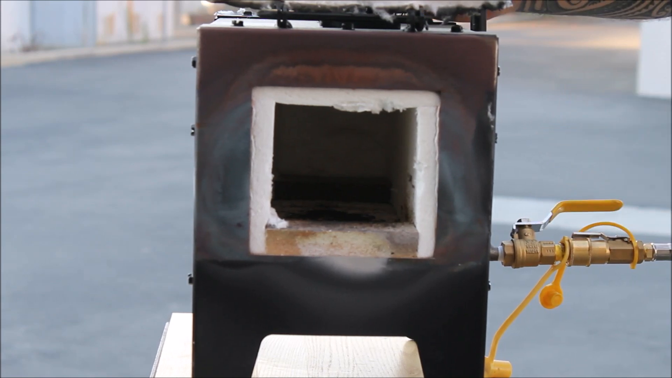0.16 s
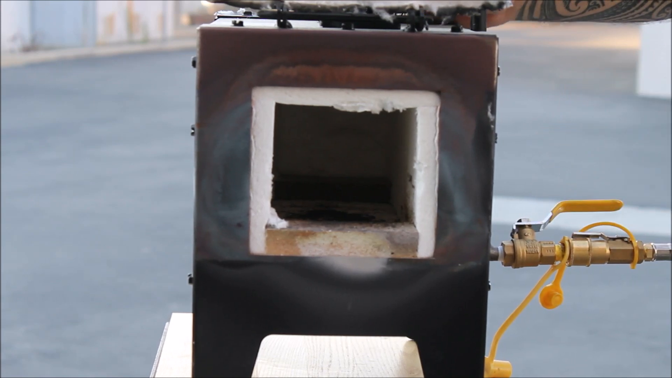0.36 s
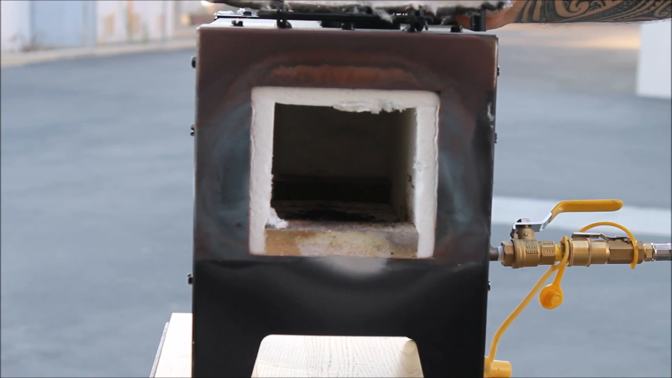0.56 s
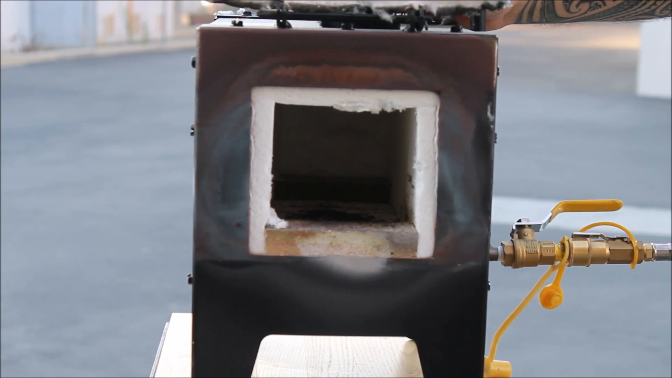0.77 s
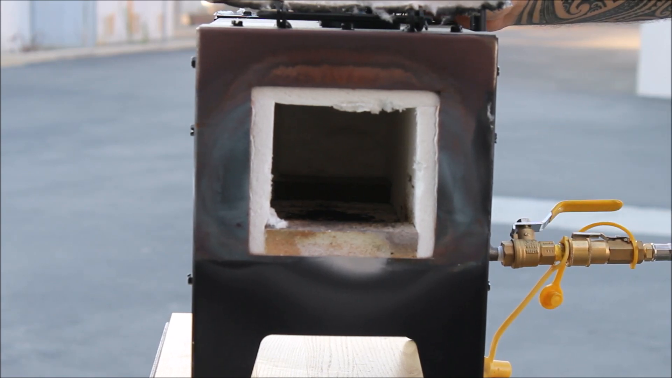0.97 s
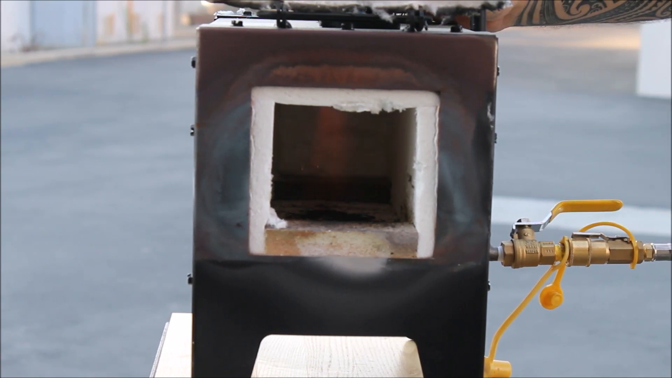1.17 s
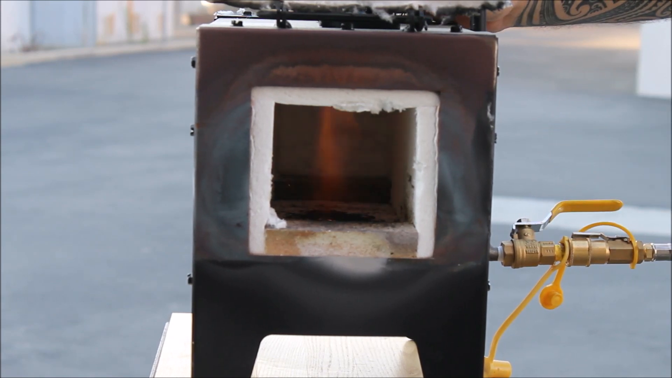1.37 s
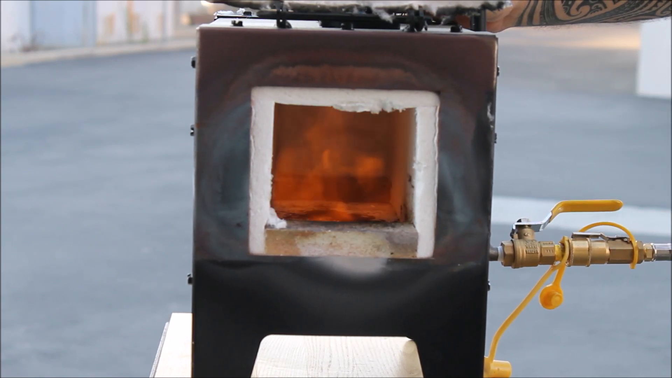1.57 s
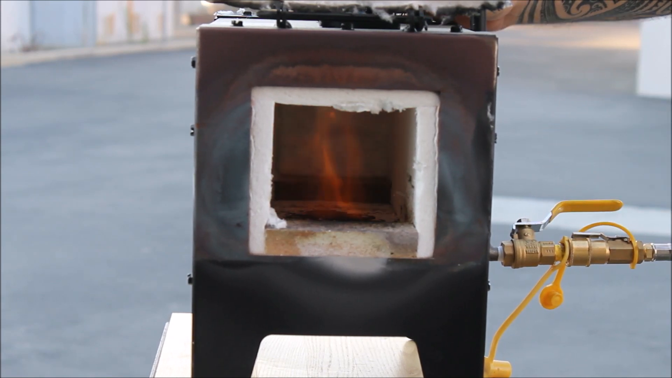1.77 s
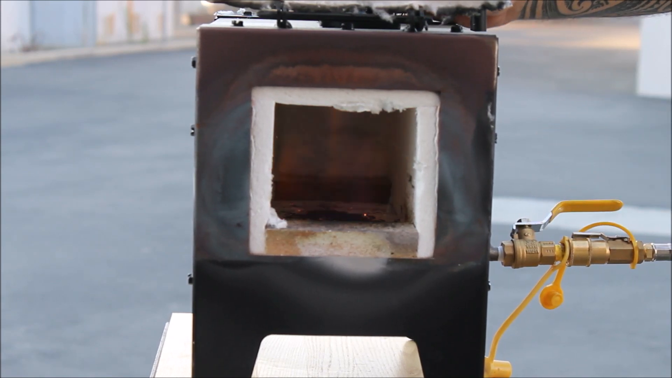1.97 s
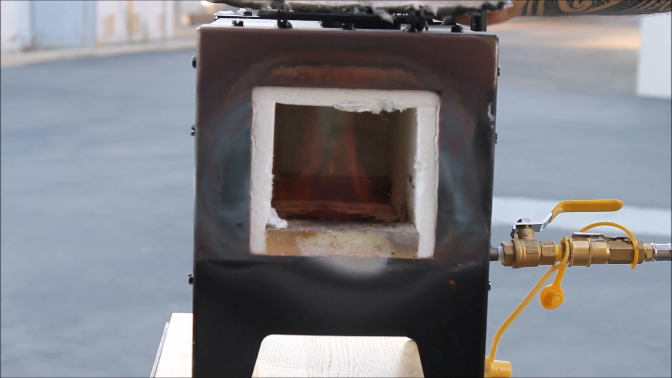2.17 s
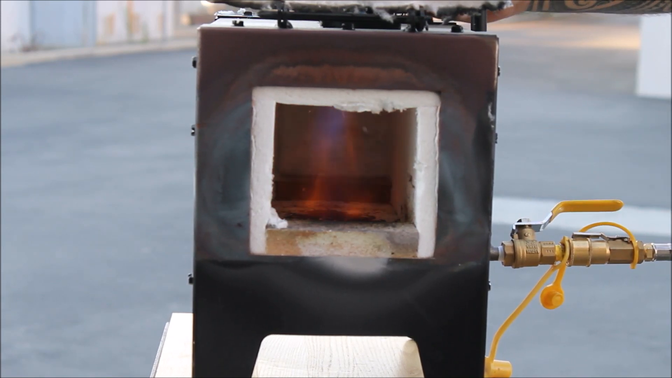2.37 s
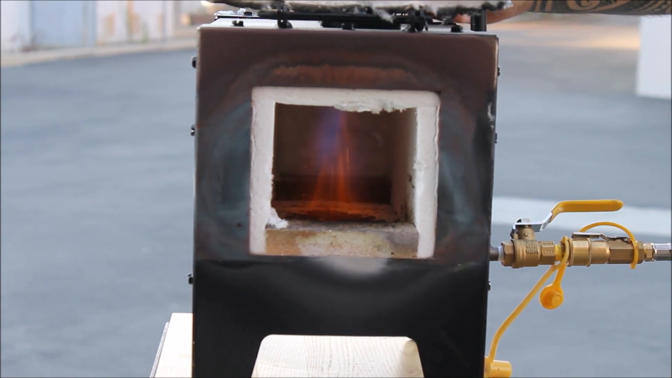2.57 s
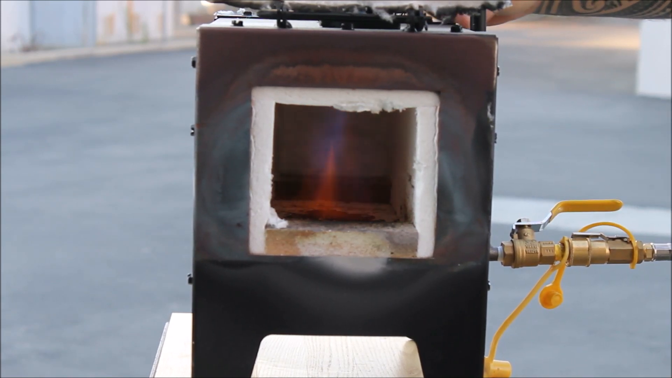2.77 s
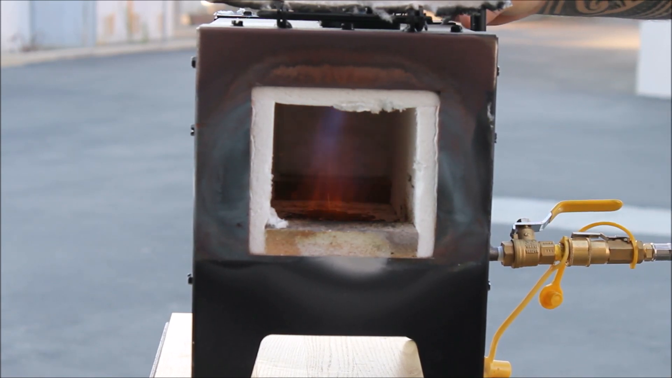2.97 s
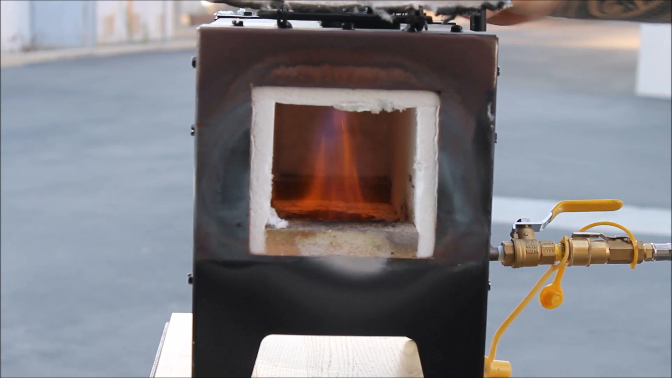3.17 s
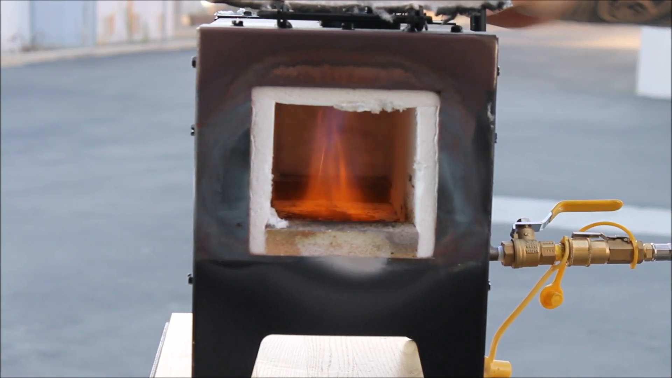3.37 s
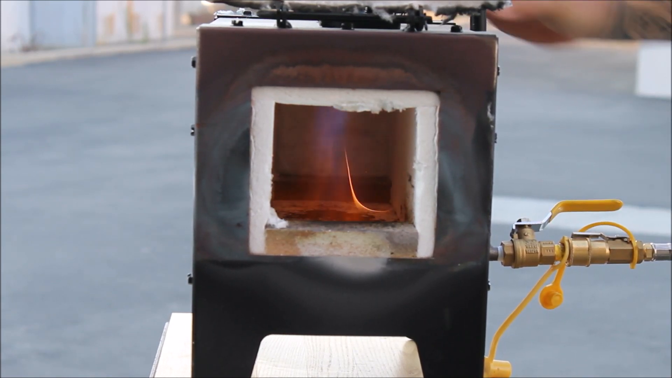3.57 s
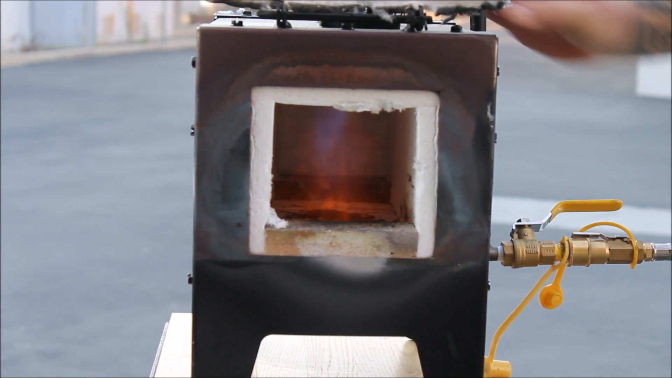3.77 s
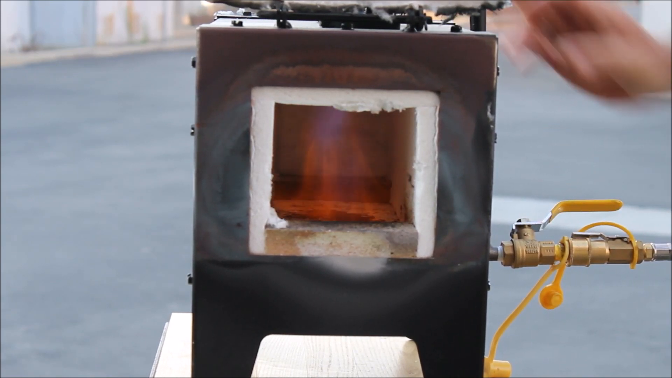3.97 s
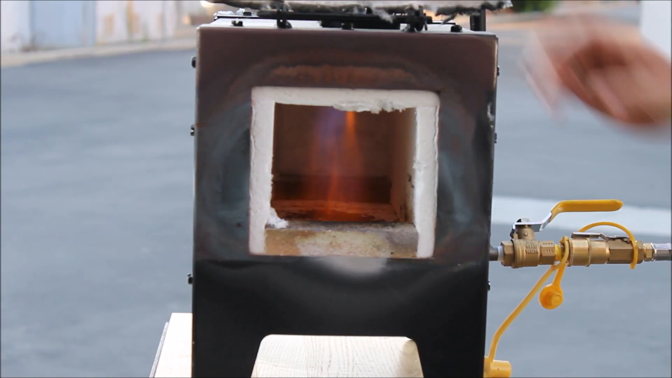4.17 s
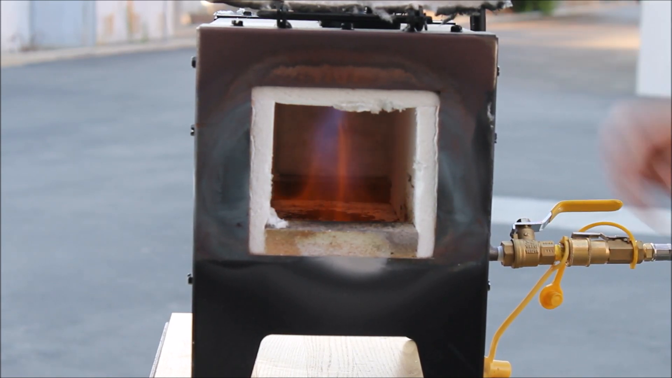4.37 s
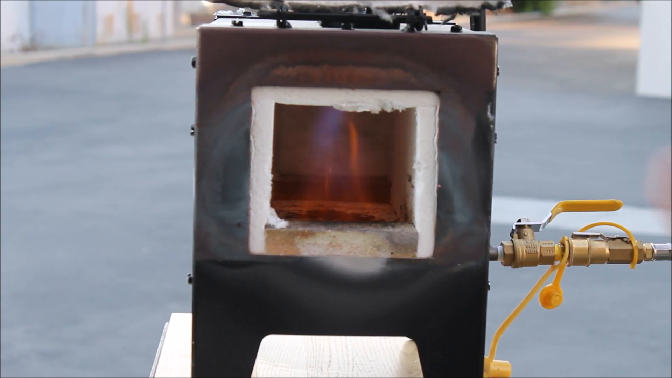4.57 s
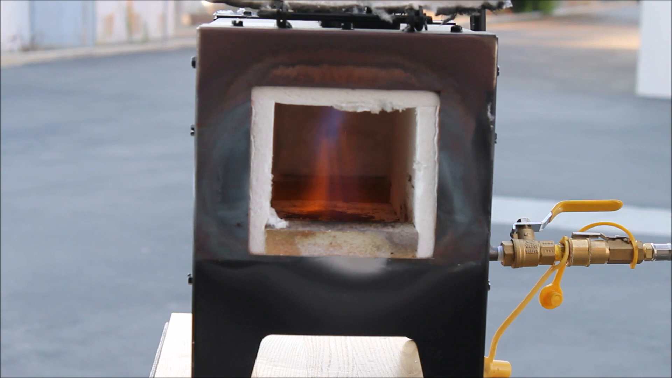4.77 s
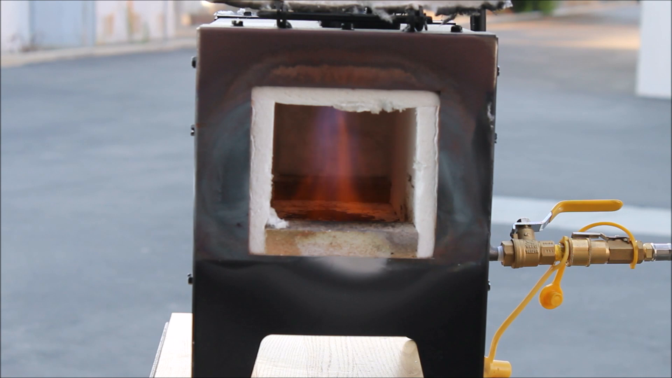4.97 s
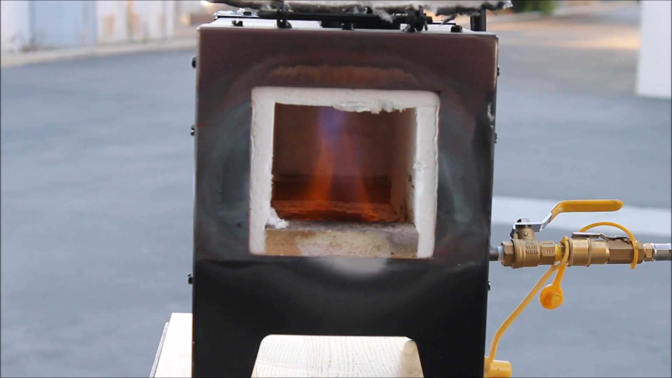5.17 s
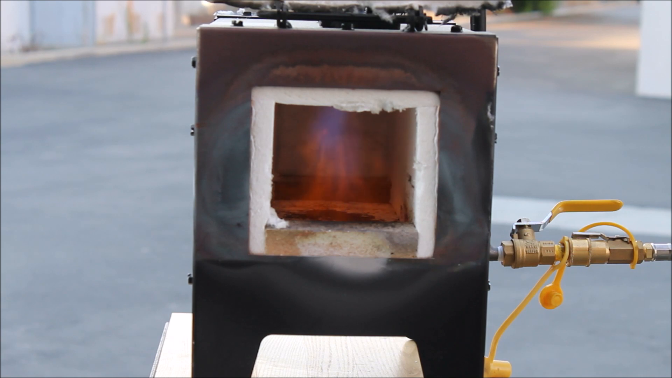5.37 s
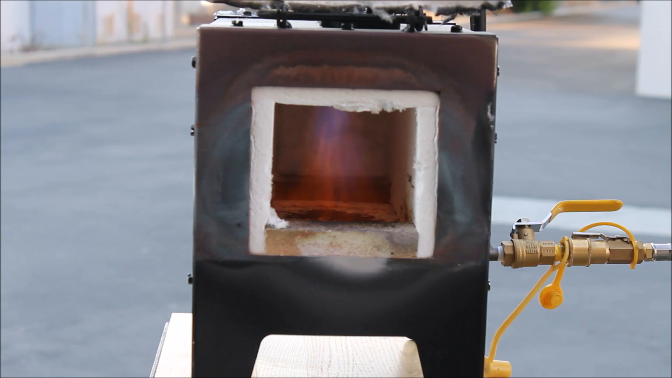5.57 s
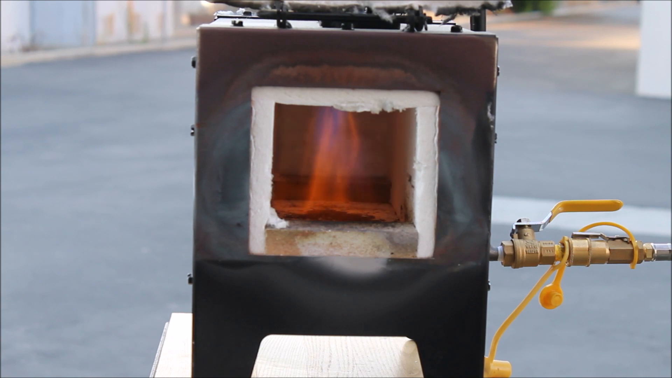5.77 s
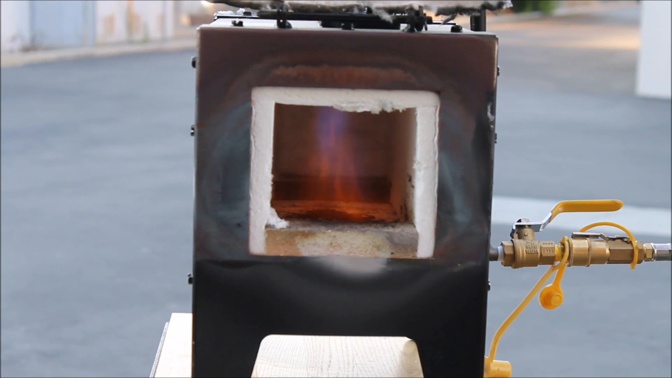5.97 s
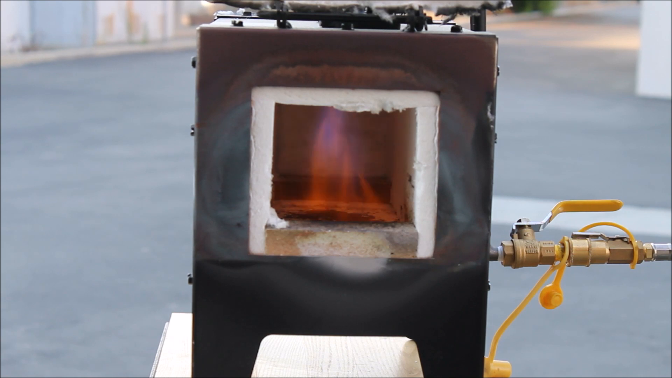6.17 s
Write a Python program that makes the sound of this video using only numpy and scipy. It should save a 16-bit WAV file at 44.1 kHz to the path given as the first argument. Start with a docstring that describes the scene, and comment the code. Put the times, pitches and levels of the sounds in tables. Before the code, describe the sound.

Hissing gas lights with a sharp, sputtering pop and a low whoomp, settling into the steady rumble of a forge flame.

```python
"""Lighting a propane forge

Outdoors, a turbulent gas jet hisses; the sound cuts out for an instant and returns muffled.
The mixture ignites with a sharp pop and sputters, ringing the steel shell, then catches with a low
whoomp. Unsteady combustion drives the air resonance of the open firebox in a steady rumble, while air
drawn through the burner tube whistles faintly. One light metallic tink sounds as the flame grows."""
import sys
import numpy as np
from scipy.fft import rfft, irfft, next_fast_len
from scipy.io import wavfile
from scipy.ndimage import uniform_filter1d, map_coordinates

SR = 44100
rng = np.random.default_rng(int(sys.argv[2]) if len(sys.argv) > 2 else 0)


def store_wav(level_fs):
    """Save 16-bit WAV to argv[1]."""
    pcm = np.round(np.clip(np.atleast_2d(level_fs), -1, 1) * 32767)
    wavfile.write(sys.argv[1], SR, pcm.T.astype(np.int16))


N = 273861


def amp(db):
    """Amplitude ratio of a level in decibels."""
    return 10 ** (np.asarray(db) / 20)


def unit(x):
    """Normalisation to rms 1."""
    return x / np.sqrt(np.mean(x ** 2) + 1e-20)


def contour(rows):
    """Linear interpolation of (t/s, value) rows at every sample."""
    return np.interp(np.arange(N) / SR, *np.transpose(rows))


def wobble(rate):
    """Smooth random modulation with rate knots a second."""
    return map_coordinates(rng.standard_normal(int(N * rate / SR) + 4), [np.arange(N) * rate / SR])


def filtered(x, response):
    """Linear filtering: the spectrum of x times a frequency response."""
    size = next_fast_len(N + SR // 2)
    return irfft(rfft(x, size) * response(np.fft.rfftfreq(size, 1 / SR)), size)[:N]


def colour(points):
    """Frequency response through (f/Hz, level/dB) points on a logarithmic frequency axis."""
    f, db = np.transpose(points)
    return lambda hz: amp(np.interp(np.log(hz + 1), np.log(f + 1), db))


def resonances(hz, modes):
    """Superposed resonance peaks, given as (f/Hz, half-width/Hz, level/dB)."""
    return sum(amp(db) / (1 + ((hz - centre) / width) ** 2) for centre, width, db in modes)


def noise(response):
    """Gaussian noise shaped by a frequency response, at rms 1."""
    return unit(filtered(rng.standard_normal(N), response))


def even(x, span):
    """Division by the running rms levels out swells slower than span seconds."""
    size = max(int(span * SR), 2)
    return x / np.sqrt(np.abs(uniform_filter1d(uniform_filter1d(x ** 2, size), size)) + 1e-9)


def since(onset):
    """Seconds elapsed after the onset, zero before it."""
    return np.maximum(np.arange(N) / SR - onset, 0)


def decay(t, attack, t60):
    """Transient envelope: a quick rise, then an exponential fall of 60 dB in t60 seconds."""
    return (1 - np.exp(-t / attack)) * amp(-60 * np.minimum(t / t60, 3))


def ringing(onset, modes, attack):
    """Free vibration: one damped sine for each (f/Hz, level/dB, t60/s) mode."""
    t = since(onset)
    return sum(amp(db) * decay(t, attack, t60) * np.sin(2 * np.pi * hz * t) for hz, db, t60 in modes)


def power_sum(*amplitudes):
    """Incoherent sources add in power; returns their joint amplitude."""
    return np.sqrt(sum(a ** 2 for a in amplitudes))


# Spectrum of the unlit gas: f/Hz, relative level/dB
JET_SPECTRUM = [(20, -9), (65, -10.5), (100, 0.5), (200, -1.5), (275, -5.5), (420, -3), (660, -7),
                (1600, -13.5), (4700, -22), (8200, -24), (10200, -39), (13000, -51), (15600, -75.5)]
# Nozzle resonances: f/Hz, half-width/Hz, relative level/dB
NOZZLE_MODES = [(3390, 31, -15), (5784, 67, 0), (6630, 120, -14.5), (7230, 120, -14), (8150, 86, -9),
                (11500, 510, -34)]

def gas_jet(hiss_db=-30, nozzle_db=-43):
    """Turbulence in the cold gas radiates broadband noise and excites narrow nozzle resonances."""
    hiss = amp(hiss_db + 0.38 * wobble(12)) * noise(colour(JET_SPECTRUM))
    return hiss + amp(nozzle_db) * noise(lambda hz: resonances(hz, NOZZLE_MODES))


# Spectrum of the air drawn through the burner: f/Hz, relative level/dB
AIR_SPECTRUM = [(30, -3), (150, 2), (260, -3.5), (420, 0.5), (700, -2), (1100, -5), (1500, -4),
                (2000, -6.5), (2400, -16), (2900, -26), (3500, -36), (4300, -55.5), (6000, -80.5)]
# Strength of that airflow: t/s, relative level/dB
AIRFLOW = [(0.9, -43), (1.7, -39.5), (1.98, -40.5), (2.2, -47), (2.5, -45), (3.42, -45.5), (3.58, -47.5),
           (4.2, -47.5), (4.85, -45), (5.1, -47.0), (5.72, -44), (6.0, -49.5), (6.2, -47)]

def draught(gain_db=4.5):
    """Flow noise: air rushes through the burner tube."""
    return amp(contour(AIRFLOW) + gain_db + 0.26 * wobble(30)) * noise(colour(AIR_SPECTRUM))


# The tube's tone comes and goes: t/s, level/dB
WHISTLE_LEVEL = [(0.9, -70), (1.06, -38.5), (1.16, -55.5), (2.0, -46.5), (2.75, -46), (3.05, -55.5),
                 (3.75, -51.5), (4.1, -59), (4.62, -45), (4.8, -53), (5.0, -47), (5.22, -48.5),
                 (5.42, -43.5), (5.85, -45.5), (6.2, -49.5)]

def whistle(pitch_hz=1448, half_width_hz=21, waver_db=2.5):
    """Flow noise excites one resonance of the burner tube, giving an airy, wavering tone."""
    tone = noise(lambda hz: resonances(hz, [(pitch_hz, half_width_hz, 0)]) * colour(AIR_SPECTRUM)(hz))
    return amp(contour(WHISTLE_LEVEL) + waver_db * wobble(17)) * even(tone, span=0.059)


# Part of the flame that burns steadily at the nozzle: t/s, share (0-1)
SETTLED_SHARE = [(1.6, 0.12), (2.0, 0.6), (2.4, .85), (2.9, 1)]
# Spectra of the loose flame, the settled flame and the flutter: f/Hz, relative level/dB
LOOSE_SPECTRUM = [(10, -13), (22, -5.5), (44, 3), (70, -5), (98, -12.5), (120, -5.5), (150, -13),
                  (220, -29), (500, -92.5)]
SETTLED_SPECTRUM = [(10, -33.5), (24, -12), (42, -1), (64, 0.5), (84, 1), (96, -5.5), (104, -26.5),
                    (118, -10.5), (140, -12.5), (168, -27), (220, -27.5), (500, -101)]
FLUTTER_SPECTRUM = [(100, -33), (175, -5.5), (208, 3), (240, -6.5), (272, 0), (295, -4), (325, -3.5),
                    (400, -9), (520, -12), (750, -18), (1200, -28.5), (3000, -79)]

def flame(coupling=0.12):
    """Uneven burning drives the firebox's air resonance, which rises in pitch as the flame settles."""
    steady, loose = steady_burn(), flares(t60=0.85)
    blast = decay(since(IGNITION_S), attack=0.0066, t60=0.8)  # air stirred up by the ignition
    # the constant first terms are the unlit stream
    rumble_gain = power_sum(amp(-31), amp(-26) * blast, amp(-15.5) * loose, amp(-14.5) * steady)
    flutter_gain = power_sum(amp(-38.5), amp(-22) * blast, amp(-32) * loose, amp(-34.5) * steady ** 0.55)
    settled = np.clip(contour(SETTLED_SHARE), 0, 1)
    loose_rumble = np.sqrt(1 - settled) * noise(colour(LOOSE_SPECTRUM))
    settled_rumble = np.sqrt(settled) * noise(colour(SETTLED_SPECTRUM))
    rumble = even(loose_rumble + settled_rumble, span=0.057)
    # each surge of the flame also tears its edge into faster flutter
    flutter = unit(even(noise(colour(FLUTTER_SPECTRUM)), span=0.21) * np.exp(coupling * rumble))
    return rumble_gain * rumble + flutter_gain * flutter


# Modes of the firebox and its steel shell: f/Hz, relative level/dB, t60/s
SHELL_MODES = [(119.6, -4, 0.61), (197, -9, 0.31), (325, -3.5, 0.45), (404.2, -5, 0.45), (790, -12, 0.073),
               (990, -12, .25), (1216, -5, 0.59), (1250, -8, 0.44), (1385, -2, 0.38), (1538, -5, 0.4),
               (1580, -11, 0.46), (1724, -3.5, 0.36), (1926, -7, 0.31), (1987, -4.5, 0.18),
               (2245, -10.5, 0.41), (2480, -17.5, 0.35), (2520, -18.5, 0.18), (2940, -27.5, 0.97)]

def shell_ring(t, rattle_hz=18):
    """Modal ringing of the shell; rattling makes each phase wander, broadening the mode by rattle_hz."""
    scatter = rng.standard_normal((len(SHELL_MODES), 2))
    walk = np.cumsum(rng.standard_normal((len(SHELL_MODES), len(t))), axis=1)
    drifts = uniform_filter1d(walk * np.sqrt(2 * np.pi * rattle_hz / SR), size=128, axis=1)
    ring = np.zeros(len(t))
    for (hz, db, t60), (offset_db, half_turns), drift in zip(SHELL_MODES, scatter, drifts):
        phase = 2 * np.pi * hz * t + np.pi * half_turns + drift
        ring += amp(db + offset_db) * decay(t, 0.0035, t60) * np.sin(phase)
    return ring


# The ignition and its sputters: t/s, level/dB, burst t60/s, relative ring level/dB, cutoff f/Hz
IGNITION_POPS = [(1.2732, -19.5, 0.046, -29.5, 3000), (1.2800, -5.5, 0.1, -14.5, 5010),
                 (1.3260, -17.5, 0.1, -19.5, 5040), (1.3790, -19, 0.097, -16, 5030),
                 (1.4289, -27, 0.086, -16.5, 2230), (1.4545, -26, 0.069, -13, 1780),
                 (1.5457, -20, 0.042, -15.5, 1740), (1.8781, -21.5, 0.053, -14.5, 1733),
                 (1.9113, -23.5, 0.04, -18, 2800)]
# Spectrum of a pop: f/Hz, relative level/dB
POP_SPECTRUM = [(100, -15), (300, 0.5), (520, -10.5), (800, -8.5), (1100, -0.5), (1400, 3.5), (2000, -0.5),
                (2200, -16.5), (2600, -7), (3100, -26), (4000, -39.5), (5500, -58.5), (8000, -90.5)]

def pops():
    """Impulsive excitation: each short noise burst sets the shell ringing; weak pops are duller."""
    t = np.arange(SR) / SR
    out = np.zeros(N + SR)
    for onset, db, t60, ring_db, cutoff_hz in IGNITION_POPS:
        ring = amp(ring_db) * shell_ring(t)
        burst = even(noise(colour(POP_SPECTRUM)), span=0.005)[:SR] * decay(t, 0.001, t60)
        pop = filtered(burst + ring, lambda hz: 1 / np.sqrt(1 + (hz / cutoff_hz) ** 10))[:SR]
        out[round(onset * SR):][:SR] += amp(db) * pop * np.minimum(t / 0.00044, 1)
    return out[:N]


IGNITION_S = 1.2793
# Modes of the burner mouth: f/Hz, level/dB, t60/s
MOUTH_MODES = [(363, -14, 0.11), (880, -4, 0.017), (1410, 2, 0.013), (1780, -0.5, 0.01), (2740, -8, 0.0067),
               (4583, -11, 0.0052), (5120, -4, 0.0036)]

def crack():
    """Heavily damped oscillation: the flame front leaves the burner in a few violent pressure swings."""
    return -ringing(IGNITION_S, MOUTH_MODES, attack=0.00037)


# Pockets of gas that flare up: t/s, level/dB, f/Hz, t60/s
GAS_POCKETS = [(1.336, -14, 41.6, 0.7), (1.665, -6.5, 42, 0.1), (1.711, -8.5, 48, 0.16),
               (1.9853, 2, 68, 0.13)]

def whoomps():
    """Cavity resonance: a pocket of gas burns at once and the air in the firebox swings a few times."""
    return -sum(ringing(onset, [(hz, db, t60)], attack=0.00096) for onset, db, hz, t60 in GAS_POCKETS)


def flares(t60):
    """Envelope of the loose flame: the pockets flare up and burn out, adding in power."""
    return power_sum(*(amp(db) * decay(since(onset), 0.008, t60) for onset, db, _, _ in GAS_POCKETS))


# Air modes of the firebox: f/Hz, half-width/Hz, relative level/dB
FIREBOX_MODES = [(214.7, 4.2, 3), (415, 8.6, 2), (560, 13, -9)]

def standing_waves(gain_db=-27):
    """While the flame still roams the firebox it excites standing waves between the walls."""
    waves = noise(lambda hz: resonances(hz, FIREBOX_MODES) * colour(AIR_SPECTRUM)(hz))
    return amp(gain_db) * flares(t60=0.83) * even(waves, span=0.072)


# Strongest surges of the settled flame: t/s, gain/dB, half-length/s
FLAME_SURGES = [(3.003, 5.5, 0.091), (3.269, 3.5, 0.07), (3.421, 5, 0.037), (3.529, 5, .025),
                (3.79, 3.5, 0.04), (4.304, 5, 0.031), (4.651, 3.5, 0.062), (4.901, 7.5, 0.056),
                (5.31, 5, .03), (5.776, 7, 0.031), (5.868, 5, 0.023)]

def steady_burn(catch_s=1.94, grow_s=0.33, puff_hz=14, puff_db=3.5, puff_fade_s=1, flicker_db=1.9):
    """Amplitude modulation of the flame: it grows in puffs, follows the draught, surges and flickers."""
    t, age = np.arange(N) / SR, since(catch_s)
    flow_db = contour(AIRFLOW)
    air_db = 0.45 * (flow_db - np.median(flow_db))
    puffing_db = puff_db * np.exp(-age / puff_fade_s) * np.sin(2 * np.pi * puff_hz * age + wobble(6))
    surge_db = sum(db * np.exp(-((t - peak) / half) ** 2) for peak, db, half in FLAME_SURGES)
    dips_db = -flicker_db * wobble(21) ** 2
    return (1 - np.exp(-age / grow_s)) * amp(air_db + puffing_db + surge_db + dips_db)


# Modes of a light metallic tink: f/Hz, level/dB, t60/s
TINK_MODES = [(1990, -31.5, 0.058), (2100, -39.5, 0.11), (2300, -46, 0.067)]

def tink(onset_s=2.388):
    """Free vibration of metal: three faint modes die away quickly."""
    return ringing(onset_s, TINK_MODES, attack=0.0012)


def scene(hiss_end_s=0.860, muffled_start_s=0.892):
    """Superposition of the sources, with an instant of silence between the hiss and the muffled rush."""
    before_gap = 1 - np.clip(since(hiss_end_s) / 0.00042, 0, 1)
    after_gap = np.clip(since(muffled_start_s) / 0.00089, 0, 1)
    burner = draught() + whistle() + flame() + standing_waves()
    return (before_gap * gas_jet() + after_gap * burner + pops() + crack() + whoomps() + tink())[None]


def record(dry, top_hz=15700):
    """Saturation flattens the loudest peaks, and a band limit removes everything above top_hz."""
    return filtered(np.clip(dry[0], -1, 1), lambda hz: hz < top_hz)[None]


dry = scene()
out = record(dry)
store_wav(out)
```